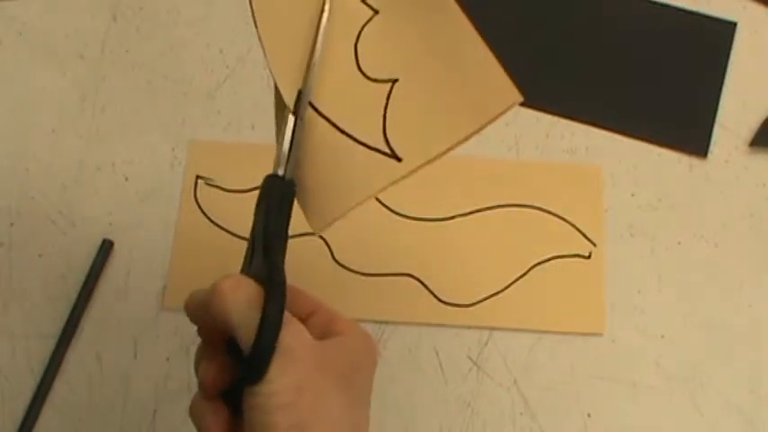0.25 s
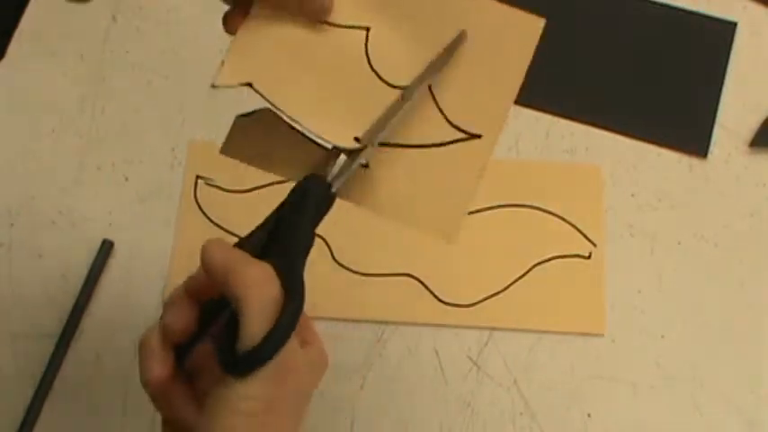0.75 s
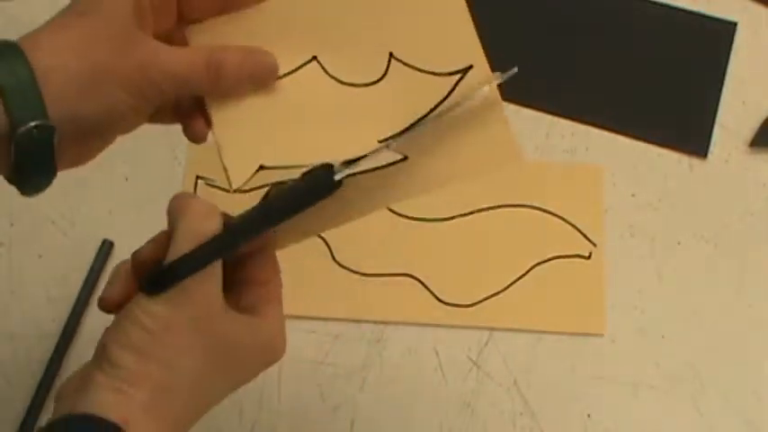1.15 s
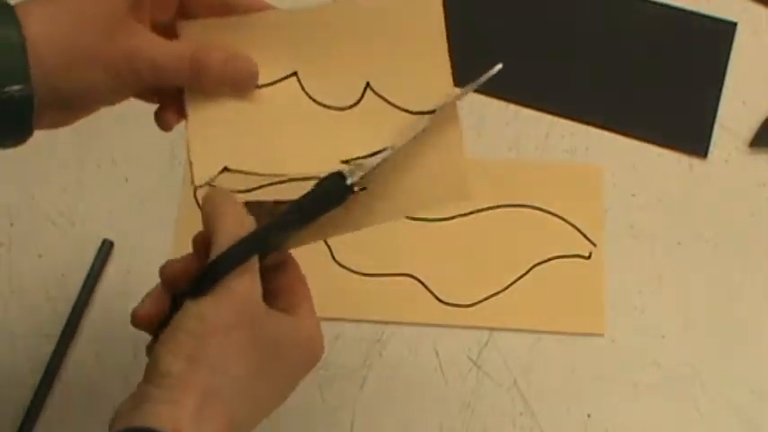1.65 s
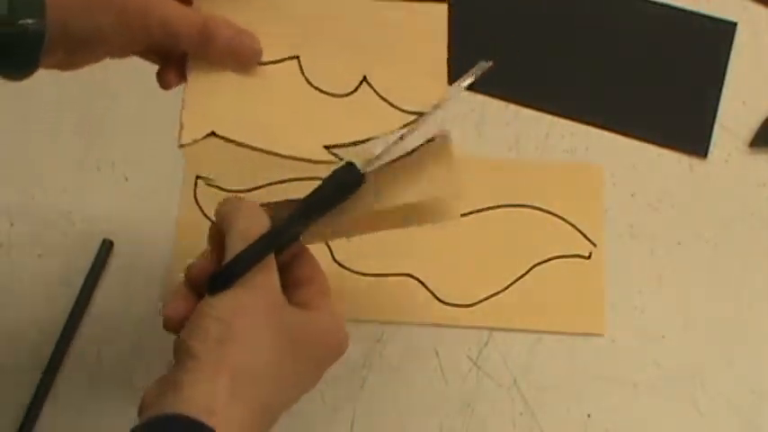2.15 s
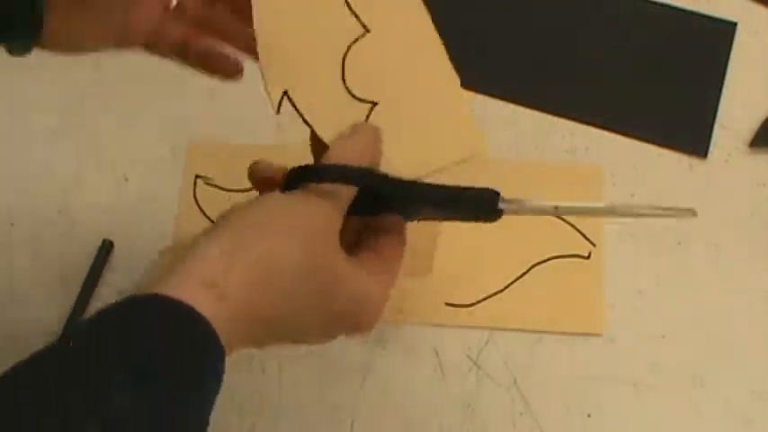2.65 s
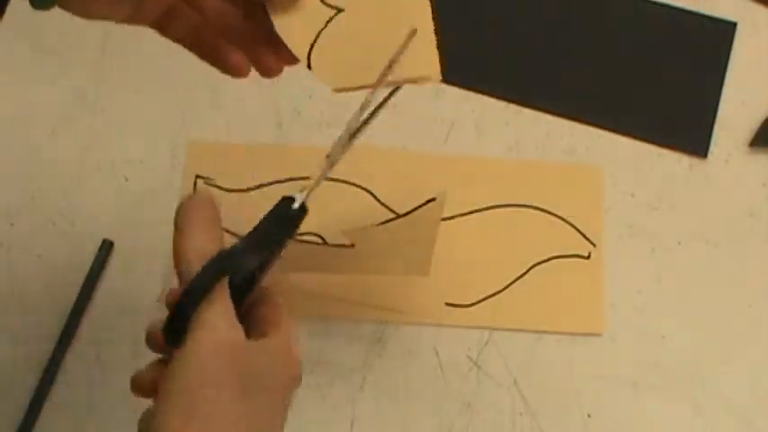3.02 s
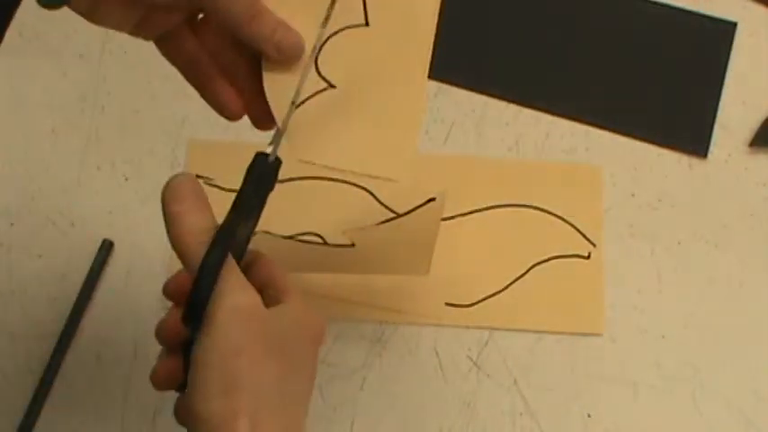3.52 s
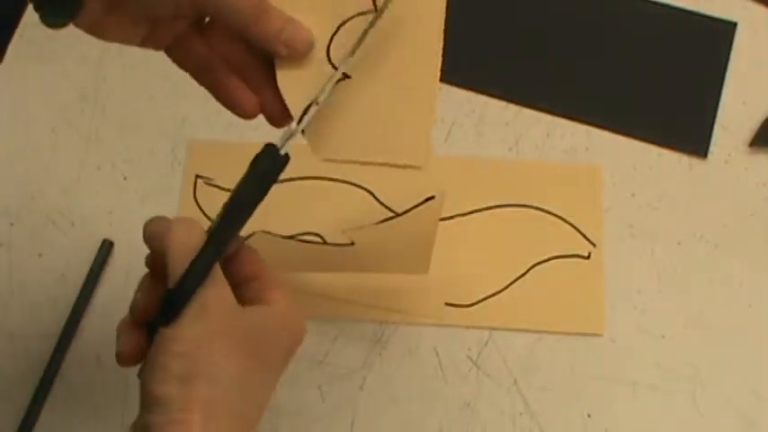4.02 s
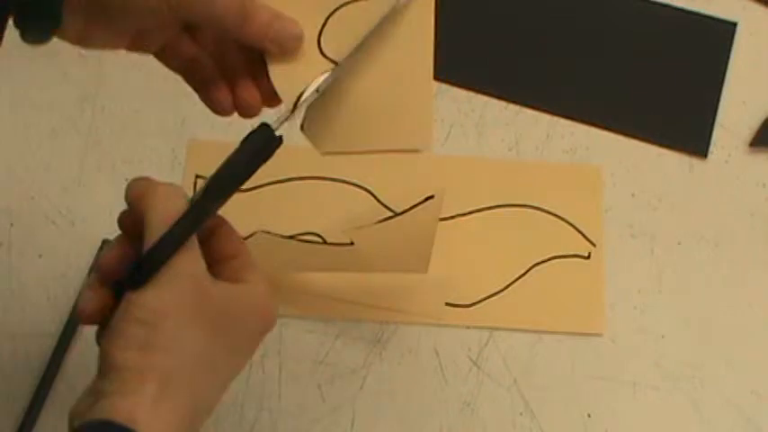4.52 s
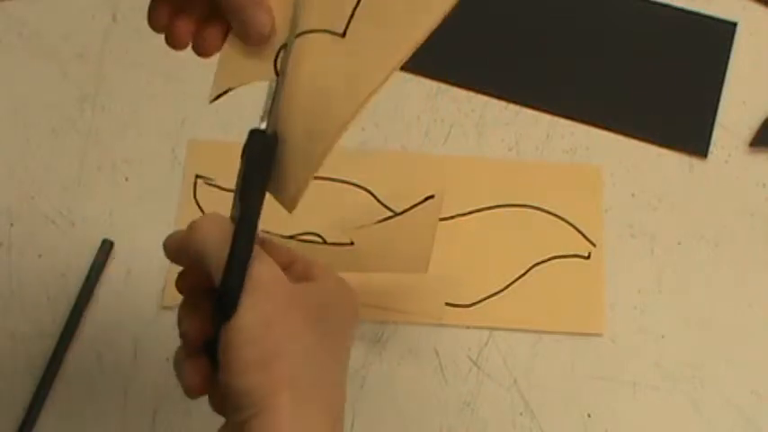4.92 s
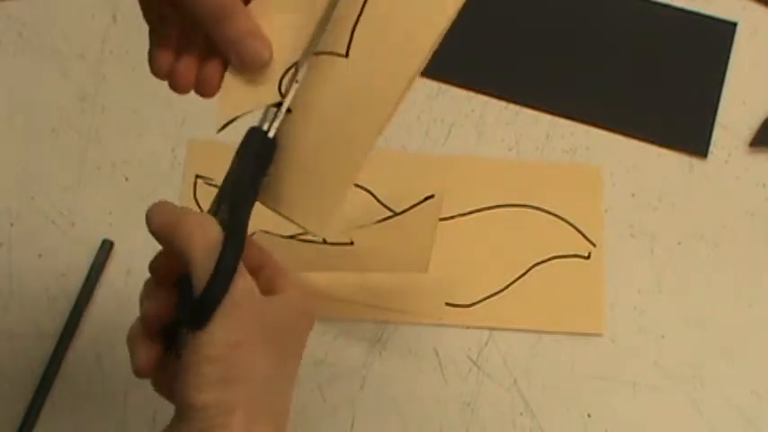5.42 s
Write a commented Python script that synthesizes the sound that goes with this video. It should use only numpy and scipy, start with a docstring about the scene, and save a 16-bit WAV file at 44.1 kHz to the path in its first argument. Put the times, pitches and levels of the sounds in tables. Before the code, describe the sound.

Scissors cut folded paper in crisp, uneven bursts and slides, with sharp crease cracks and a handle clack, in a quiet room.

```python
"""Scissors work through folded paper over a desk in a quiet room.
Fibre breaks, random clicks of uneven size, excite the resonances of blade edges, tips, flats and sheet;
their power follows steady slides, jerky bursts and chattering runs. Creases crack as filtered clicks,
handles clack and dull bumps sound as damped sines, and an offcut rasps as a sine of unsteady pitch.
Below lie air handling, as bands of noise, mains hum and a faint high whine, as wavering sines."""
import sys
import numpy as np
from scipy import signal
from scipy.fft import rfft, irfft, next_fast_len
from scipy.io import wavfile

SR = 44100
rng = np.random.default_rng(int(sys.argv[2]) if len(sys.argv) > 2 else 0)


def materialize(psi):
    """Save the field psi as 16-bit PCM at rate SR to the path in sys.argv[1].

    A 1-D psi becomes a single channel; in a 2-D psi each row is a channel.
    """
    bounded = np.clip(np.atleast_2d(psi).T, -1, 1)
    quanta = np.round(bounded * 32767).astype(np.int16)
    wavfile.write(sys.argv[1], SR, quanta)


N = 250047

# Spectral density of the air noise, relative: frequency_hz, density_db
AIR_SPECTRUM = [(22, -41), (40, -13), (70, -4.5), (150, -7.5), (400, -12), (800, -20.5), (1600, -25),
                (2600, -30.5), (6000, -36.5), (16000, -38)]
# Left-right correlation of the air noise: frequency_hz, correlation (-1 to 1)
AIR_CORRELATION = [(60, 1), (240, 0.96), (950, 0.68), (3770, 0.45), (15000, 0.5)]
# Steady hum and whine lines: frequency_hz, level_db (rms, before its drift), phase_waver_rad
HUM_LINES = [(29.5, -55, .6), (59.8, -53, .9), (15734, -67, 1.2)]
AIR_DB = -45  # rms
ROOM_T60_S, ROOM_DB, WALL_CUT_HZ = 0.12, -16, 1700  # decay time before the walls' treble loss
# Dull pops of the sheet, far bumps and the low ring of the handles' clacks: start_s, level_db (before swell and
# decay), pitch_hz, t60_s
BUMPS = [(.187, -40.5, 411, 0.54), (.551, -34, 520, 0.069), (0.953, -38, 394, 0.09),
         (1.038, -38, 652, 0.13), (2.167, -16.5, 654, 0.02), (2.492, -24, 510, 0.037),
         (2.523, -22.5, 760, 0.034), (2.526, -15, 383, 0.016), (3.208, -33, 100.5, 0.27),
         (3.246, -25.5, 96, 0.11), (3.286, -31.5, 82.3, 0.27), (3.371, -39, 83.6, 0.26),
         (4.519, -38, 399.5, 0.15), (4.606, -32.5, 464, 0.04), (5.15, -38.5, 663, 0.054),
         (5.511, -22.5, 660, 0.022)]
# The handles meet: start_s, level_db
CLACKS = [(2.171, -19.5), (2.521, -12)]
# Upper modes of the handles: frequency_hz, level_db (relative to the clack), t60_s
HANDLE_MODES = [(1700, -1, .022), (2200, -1, .02), (3100, -7, .015)]
# Lone creases cracking: start_s, level_db
CRACKS = [(0.431, -45), (1.223, -19), (2.3259, -18), (2.4008, -30), (3.1376, -33), (4.409, -20.5),
          (4.476, -22), (4.5569, -18.5), (4.7997, -12.5), (4.8066, -8), (4.8289, -17), (4.876, -19.5),
          (4.9816, -21)]
# Rasp as the offcut is dragged away: time_s, pitch_hz, level_db
RASP = [(2.866, 2780, -65), (2.875, 3040, -38.5), (2.882, 2150, -41), (2.909, 2030, -44),
        (2.914, 2100, -71)]

# Resonances of the blade edges: frequency_hz, width_hz, level_db (relative)
EDGE_MODES = [(7800, 1400, -5), (8550, 530, 0), (9400, 700, -2), (10400, 880, 1)]
# Resonances of the blade tips: frequency_hz, width_hz, level_db (relative)
TIP_MODES = [(12130, 2140, 0), (14330, 1700, -7), (15400, 800, -8.5)]
# Resonances of the blade flats: frequency_hz, width_hz, level_db (relative)
FLAT_MODES = [(2910, 750, -2), (3890, 620, -0.65), (4645, 600, 1), (5470, 1230, 0.16)]
# Resonances of the paper sheet: frequency_hz, width_hz, level_db (relative)
SHEET_MODES = [(343, 320, -3), (648, 374, 1), (1094, 370, -2.5), (1583, 300, 3), (2150, 114, -6.5),
               (2176, 68, -4)]

# Runs of small uneven jerks in slow cutting: start_s, end_s, level_db, flats_db (relative to level_db)
CHATTER = [(0.058, .48, -53.5, -16), (3.85, 4.03, -42, -7), (5.245, 5.29, -49.5, 5)]
CHATTER_GAP_S, CHATTER_MS, CHATTER_SPREAD_DB = .027, 7.6, 1.5  # median gap and length; level spread
# Louder jerks of the cut and of handled paper: start_s, level_db, length_ms, flats_db (relative to level_db)
JERKS = [(.0065, -28, 4.5, -9), (.0282, -31.5, 7.9, -10), (0.1073, -34.5, 3.3, -9.5),
         (0.147, -37.5, 10.4, -7.5), (.168, -37, 2.6, -12), (.183, -32, 7.1, -8), (0.2308, -26.5, 2.9, -9),
         (.27, -29.5, 3.4, -8), (0.2963, -33, 10.4, -5.5), (0.332, -39.5, 5.6, -4.5),
         (1.0354, -31, 8.9, -10), (1.09, -40, 16, -2.5), (1.114, -41.5, 15, -5), (1.159, -33.5, 11, -4),
         (1.1933, -27.5, 5.4, -6.5), (1.222, -23.5, 4.5, -15), (1.252, -30, 3.2, -6.5),
         (1.4867, -26, 3.5, -4), (1.5031, -26.5, 5.5, -6), (1.519, -24.5, 7, -7), (1.5327, -25, 16, -4),
         (1.5553, -30.5, 7.5, -11), (1.5714, -28, 7.7, -4), (1.846, -25, 2.1, -5), (1.8538, -31, 7.7, -11),
         (1.906, -22.5, 10.7, -8), (1.9307, -21.5, 9, -5), (1.9541, -22.5, 6.9, -5.5),
         (1.985, -25.5, 11, -4), (2.0402, -30.5, 6.2, -6), (2.068, -30, 13.6, -7.5), (2.0969, -25, 7, -6),
         (2.1335, -30.5, 14, -5), (2.1658, -18, 9, -9.5), (2.291, -32, 9.8, -14), (2.3239, -18, 1.5, -28),
         (2.347, -33, 3.1, -12), (2.4903, -40, 7.1, -4), (2.5211, -25.5, 4.3, 3.5),
         (2.774, -37.5, 11, -10.5), (2.8247, -42, 6.8, -4.5), (3.2173, -47, 16, -4.5), (3.31, -52, 16, 3),
         (3.38, -54, 4.6, -6), (4.0613, -34.5, 3.9, -6.5), (4.0747, -41, 15.4, -3), (4.095, -41.5, 9.9, -4),
         (4.121, -34.5, 11, -4.5), (4.1395, -37.5, 8.6, -2.5), (4.172, -34, 4.1, -17),
         (4.185, -37, 7.3, -2.5), (4.2135, -43, 7.8, 4), (4.244, -32, 9.2, 2.5), (4.2688, -31, 9.2, -1.5),
         (4.2942, -31, 2.6, -6), (4.3154, -27.5, 8.8, 0), (4.334, -32.5, 8.8, 1), (4.3558, -31.5, 4.2, 1),
         (4.3744, -39, 3.2, 4), (4.385, -37.5, 12, -2), (4.4726, -31, 4.2, -4.5), (4.606, -28, 6.8, -3.5),
         (5, -35, 3.1, -7), (5.031, -43, 2.5, -8), (5.048, -36.5, 2.9, -5), (5.057, -33, 2.2, -2),
         (5.07, -40, 3.7, -3), (5.082, -37, 3.9, 1), (5.0926, -34.5, 8.7, -0.5), (5.147, -30.5, 10, -3),
         (5.1982, -45, 18, -6), (5.2405, -32.5, 10.5, -3), (5.5239, -30, 5, -9), (5.538, -37.5, 10, -2),
         (5.5603, -39, 14.5, -2.5)]
# Sheet in the jerks as the grip changes: time_s, sheet_db (relative to the flats)
JERK_SHEET = [(0, -4), (.3, 1.5), (1.15, -3), (1.25, -13), (1.55, -4), (1.9, -9.5), (2.1, -11),
              (2.17, -0.5), (2.3, -16), (2.52, -6), (4.1, -1.5), (4.3, -5.5), (4.5, 3), (5.07, -9),
              (5.2, -0.5), (5.55, -3.5)]
JERK_TIPS_DB = -5  # tips relative to edges in a jerk
# Sliding strokes of blades and fingers on the paper: start_s, length_s, loudest (share of length, 0-1),
# level_db (at the loudest), fade_db (fall by the end), flats_db, sheet_db, tips_db (relative to level_db)
STROKES = [(0, 0.031, 0, -42, 9, -3, 3, -9), (0.225, 0.14, 0, -41.5, 24, -4, 2.5, -9),
           (0.507, 0.084, 0.7, -50, 2, -2, 1.5, -3), (0.564, 0.18, 0.32, -29.5, 19.5, -6.5, -13, -4.5),
           (0.738, 0.074, 0.26, -35, 5, -3, -5.5, -1.5), (.79, 0.2, 0.1, -47, 4, -3.5, -5, 0.5),
           (0.897, 0.19, 0.55, -39, 8, -5.5, -6, -6.5), (1.146, 0.16, 0.35, -38.5, 15, -4.5, -7.5, -2),
           (1.341, 0.12, 0.42, -34.5, 11.5, -5, -9, -3.5), (1.466, 0.13, .4, -31, 16.5, -2, -7, -12),
           (1.665, 0.12, 0.23, -32, 12, -5, -8.5, -5), (1.827, 0.21, 0.2, -29.5, 17, -4.5, -11, -7),
           (2.044, 0.13, 0.1, -43, 14, -2, -9, -5), (2.134, 0.12, 0.41, -42, 23, -6, 0, -8),
           (2.289, 0.09, .4, -42, 5, -12, -13.5, -3), (2.406, 0.048, 0.3, -44, 7, -15, -17, -5),
           (2.466, 0.19, 0.2, -46.5, 4.5, -2, -1, -4), (2.77, 0.12, 0, -42, 19, -6.5, -8.5, -4),
           (2.86, 0.06, 0.5, -29, 9, -11.5, -19, -2), (2.909, 0.12, .05, -51.5, 13, -4, -3, -4),
           (3.431, 0.042, 0.16, -56.5, 7, 8, 5, -8), (3.788, 0.31, 0.33, -45.5, 12.5, -1, -3.5, 1),
           (4.043, 0.39, 0.58, -48, 0.5, 1.5, -0.5, -1), (4.49, 0.37, 0.23, -34.5, 9, -4.5, -3.5, -4),
           (4.751, 0.17, 0.83, -36.5, 3, -6.5, -12, -7), (4.918, 0.1, 0.42, -39.5, 17, -7, -12, -7),
           (5.062, 0.082, 0.14, -40.5, 14, -2, -2, -11), (5.132, 0.093, 0.3, -42, 1, -4, -7.5, -11),
           (5.344, .085, .35, -34, 7, -3.5, -7.5, -2.5), (5.469, 0.056, .6, -37, 8, -1.5, -11.5, -5),
           (5.604, 0.062, 0.17, -43, 15, -5, -4.5, -4)]
RISE_DB, RISE_BEND, FALL_BEND = 19, 1.86, 1.24  # swell to the loudest point; bends over 1 flatten the top
STICK_S = 0.0097  # ramp at the start and end of a stroke
TOUCH_DB, APART_DB = -60.5, -73.5  # paper resting between the blades, and clear of them
APART_START_S, APART_END_S = 2.64, 3.79  # the paper is off the blades
WORK_PAN_DB = -1.0  # left minus right of the work in the hands
CUTOFF_HZ = 16650


def from_db(db):
    """Logarithmic level: 20 dB is a factor of ten in amplitude."""
    return 10 ** (np.asarray(db) / 20)


def rms_one(x):
    """Normalisation of the mean power: the result has rms 1."""
    return x / np.sqrt(np.mean(x ** 2) + 1e-20)


def at_hz(points, hz):
    """Logarithmic frequency scale: a spectrum is interpolated by frequency ratio."""
    frequency_hz, value = np.transpose(points)
    return np.interp(np.log(hz), np.log(frequency_hz), value)


def drift(rate_hz):
    """Low-pass random process: noise through two equal poles, of rms 1."""
    pole = np.exp(-2 * np.pi * rate_hz * 40 / SR)  # computed at every 40th sample
    noise = rng.standard_normal(N // 40 + 2002)
    slow = signal.lfilter([1], [1, -2 * pole, pole * pole], noise)[2000:]  # the onset is dropped
    return np.interp(np.arange(N) / 40, np.arange(len(slow)), rms_one(slow))


def ring(start_s, level_db, hz, t60_s):
    """Damped oscillation: a sine decays exponentially after swelling over its first cycle and a half."""
    t = np.maximum(np.arange(N) / SR - start_s, 0)
    swell = 1 - np.exp(-t * hz / 0.59)
    return from_db(level_db - 60 * t / t60_s) * swell * np.sin(2 * np.pi * hz * t)


def body(x, modes, wander_db):
    """Modal superposition: parallel resonators of alternating sign keep the power of a white drive,
    while their balance wanders with the grip."""
    out, power = 0, 0
    for k, (hz, width_hz, level_db) in enumerate(modes):
        r = np.exp(-np.pi * width_hz / SR)
        b = (1 - r * r) / 2 * np.array([1, 0, -1])
        a = [1, -2 * r * np.cos(2 * np.pi * hz / SR), r * r]
        gain = from_db(level_db + wander_db * drift(2.22))
        out = out + (-1) ** k * gain * signal.lfilter(b, a, x)
        power += from_db(2 * level_db) * (1 - r * r) / 2
    return out / np.sqrt(power)


def hum():
    """Line spectrum: sines at fixed frequencies waver slowly in level and phase."""
    t = np.arange(N) / SR
    out = 0
    for hz, level_db, waver_rad in HUM_LINES:
        amplitude = np.sqrt(2) * from_db(level_db + 2.94 * drift(3.4))
        out = out + amplitude * np.sin(2 * np.pi * hz * t + waver_rad * drift(5.1))
    return out


def air(patchy_db):
    """Partly coherent broadband noise: half-octave bands mix common and opposed parts and flicker slowly."""
    out, edges_hz = 0, np.geomspace(20, 16200, 20)
    white = rng.standard_normal((2, 2, N))
    for k, (low, high) in enumerate(zip(edges_hz, edges_hz[1:])):
        band = signal.butter(2, [low, high], "band", fs=SR, output="sos")
        mid, side = signal.sosfilt(band, white[k % 2])  # neighbouring bands are independent
        hz = np.sqrt(low * high)
        alike = np.clip(at_hz(AIR_CORRELATION, hz), -1, 1)
        gain = from_db(at_hz(AIR_SPECTRUM, hz) + patchy_db * drift(3.9))
        out = out + gain * (np.sqrt(1 + alike) * mid + np.sqrt(1 - alike) * side * [[1], [-1]])
    return from_db(AIR_DB) * rms_one(out)


def room(x):
    """Reverberation by recirculation: eight feedback delays a side lose treble at every pass."""
    size = next_fast_len(N + SR)  # padded, since the loops are evaluated in frequency
    w = 2 * np.pi * np.arange(size // 2 + 1) / size
    wall_loss = 1 / (1 + 1j * w * SR / (2 * np.pi * WALL_CUT_HZ))
    response = np.zeros((2, size // 2 + 1), complex)
    for k, lag_s in enumerate(rng.uniform(0.0039, .03, 16)):
        loop = from_db(-60 * lag_s / ROOM_T60_S) * wall_loss * np.exp(-1j * w * lag_s * SR)
        response[k % 2] += (-1) ** (k // 2) * loop / (1 - loop)
    return irfft(response * rfft(x, size), size)[:, :N]


def near_reflections(x, side_db):
    """Early scattering: reflections off desk and hands within a few ms add with opposite sign left and right."""
    t = np.arange(400) / SR
    scatter = rng.standard_normal(len(t)) * from_db(-60 * t / 0.019)
    side = signal.fftconvolve(x, scatter / np.linalg.norm(scatter))[:N]
    return x + from_db(side_db) * side * [[1], [-1]]


def bumps():
    """Single-mode impact response: each pop, bump or knock rings at one low pitch."""
    return sum(ring(*bump) for bump in BUMPS)


def clacks():
    """Modal impact response: each blow excites the upper modes of the plastic handles; their low ring sounds
    among the bumps."""
    return sum(ring(start_s, clack_db + mode_db, hz, t60_s)
               for start_s, clack_db in CLACKS for hz, mode_db, t60_s in HANDLE_MODES)


def rasp():
    """Frequency modulation: a rubbed edge is a sine of unsteady pitch and rough loudness.
    It holds its first, faint level from the outset and is silent at its lowest level."""
    time_s, pitch_points, level_points = np.transpose(RASP)
    t = np.arange(N) / SR
    pitch_hz, level_db = np.interp(t, time_s, pitch_points), np.interp(t, time_s, level_points)
    sounding = level_db > level_db.min()
    phase = 2 * np.pi * np.cumsum(pitch_hz * (1 + .04 * drift(154))) / SR
    return sounding * from_db(level_db + 2.7 * drift(120)) * np.sin(phase)


def cracks():
    """Impulsive fracture: a crease gives one sharp click, thin in the bass, with a short noisy shiver."""
    clicks = np.full(N, 1e-18)
    for start_s, level_db in CRACKS:
        clicks[int(start_s * SR)] = from_db(level_db + 8.0)  # makes up for the band-pass loss
    shiver = signal.lfilter([1], [1, -.975], clicks) * rng.standard_normal(N)
    band = signal.butter(2, [3200, 13000], "band", fs=SR, output="sos")
    return signal.sosfilt(band, clicks + 0.14 * shiver)


def fibres(per_s, spread_db):
    """Shot noise: fibre breaks are random clicks of uneven size and either sign, of rms 1."""
    size_db = spread_db * np.minimum(rng.exponential(1, N), 4)
    sizes = from_db(size_db) * rng.choice([-1, 1], N)
    return rms_one(sizes * (rng.random(N) < per_s / SR))


def chatter():
    """Irregular stick-slip: small jerks of uneven gap, length and strength fill each run."""
    rows = []
    for start_s, end_s, level_db, flats_db in CHATTER:
        gap, strength, size = rng.standard_normal((40, 3)).T
        times = start_s + np.cumsum(CHATTER_GAP_S * np.exp(0.347 * gap)) - CHATTER_GAP_S
        levels_db = level_db + CHATTER_SPREAD_DB * strength
        lengths_ms = CHATTER_MS * np.exp(0.86 * size)
        rows += [(s, jerk_db, length_ms, flats_db)
                 for s, jerk_db, length_ms in zip(times, levels_db, lengths_ms) if s < end_s]
    return rows


def jerks(roundness):
    """Stick-slip: each jerk swells and stops as the blades stick; power for edges, flats, sheet and tips."""
    power = np.zeros((4, N))
    for start_s, level_db, length_ms, flats_db in JERKS + chatter():
        u = np.linspace(0, 1, int(max(length_ms, 1) * SR / 1000))
        shape = np.sin(np.pi * u ** 0.53) ** roundness  # loudest early on
        sheet_db = flats_db + np.interp(start_s, *np.transpose(JERK_SHEET))
        levels = from_db(level_db + np.array([[0], [flats_db], [sheet_db], [JERK_TIPS_DB]]))
        at = int(start_s * SR)
        power[:, at:at + len(u)] += ((levels * rms_one(shape)) ** 2)[:, :N - at]
    return power


def strokes():
    """Sliding friction: each stroke swells, fades and stops; power for edges, flats, sheet and tips."""
    t = np.arange(N) / SR
    apart = (t > APART_START_S) & (t < APART_END_S)
    power = np.ones((4, 1)) * from_db(2 * np.where(apart, APART_DB, TOUCH_DB))
    for start_s, length_s, loudest, level_db, fade_db, *parts_db in STROKES:
        u, top = np.linspace(0, 1, int(length_s * SR)), np.clip(loudest, .02, .98)
        rise_db = RISE_DB * np.abs(1 - u / top) ** RISE_BEND
        fall_db = fade_db * np.abs((u - top) / (1 - top)) ** FALL_BEND
        levels_db = level_db - np.where(u < top, rise_db, fall_db) + np.array([0, *parts_db])[:, None]
        ramp = np.minimum(np.minimum(u, 1 - u) * length_s / STICK_S, 1)
        at = int(start_s * SR)
        power[:, at:at + len(u)] += (from_db(2 * levels_db) * ramp ** 2)[:, :N - at]
    return power


def cutting():
    """Common excitation: slides and jerks drive the same fibre breaks into edges, tips, flats and sheet."""
    slide = strokes()
    # light contact catches and lets go, firm contact glides
    looseness = np.clip((-31 - 10 * np.log10(slide[0])) / 15, .3, 1)
    judder_db = 2.6 * looseness * drift(94)
    fine_grain = fibres(per_s=14000, spread_db=2.5)
    stray_ticks = fibres(per_s=200, spread_db=1.0)
    power = slide * from_db(2 * judder_db) + jerks(roundness=0.38)
    to_edges, to_flats, to_sheet, to_tips = np.sqrt(power) * (fine_grain + 0.49 * stray_ticks)
    edges = body(to_edges, EDGE_MODES, wander_db=2.0) + body(to_tips, TIP_MODES, wander_db=0.0)
    flats = body(to_flats, FLAT_MODES, wander_db=1.3)
    sheet = body(to_sheet, SHEET_MODES, wander_db=2.0)
    return edges, flats, sheet


def scene():
    """Superposition: close work, low bumps, their reverberation and the background add linearly."""
    edges, flats, sheet = cutting()
    edges = edges + cracks()
    sheet = sheet + clacks() + rasp()
    close = (near_reflections(edges, side_db=-15) + near_reflections(flats, side_db=-13)
             + near_reflections(sheet, side_db=-24))
    close = close * from_db(WORK_PAN_DB / 2 * np.array([[1], [-1]]))
    low = bumps()
    wet = from_db(ROOM_DB) * room(edges + flats + sheet + 1.3 * low)
    background = (air(patchy_db=1.85) + hum()) * from_db([[.3], [-.3]])  # slightly to the left
    return close + low + wet + background


def record(dry):
    """Band limitation: a steep low-pass removes the top of the spectrum."""
    return signal.sosfilt(signal.cheby2(14, 70, CUTOFF_HZ, fs=SR, output="sos"), dry)


dry = scene()
out = record(dry)
materialize(out)
```